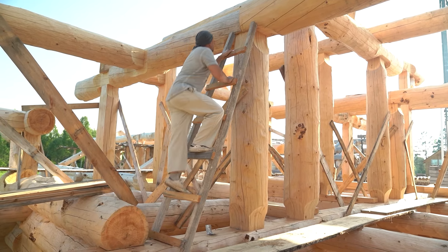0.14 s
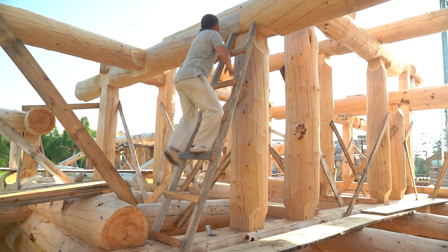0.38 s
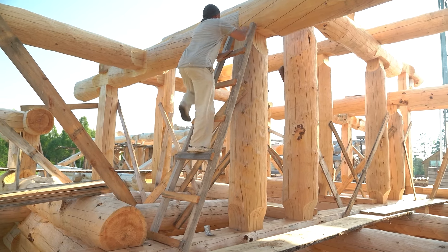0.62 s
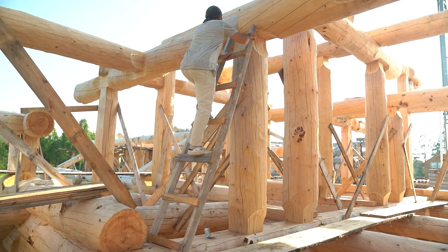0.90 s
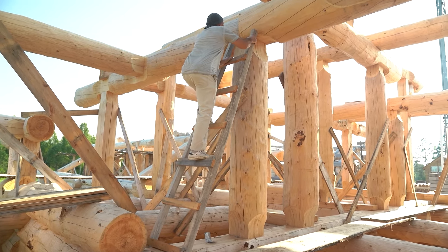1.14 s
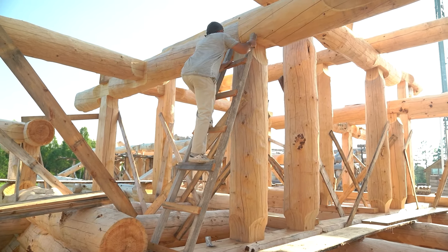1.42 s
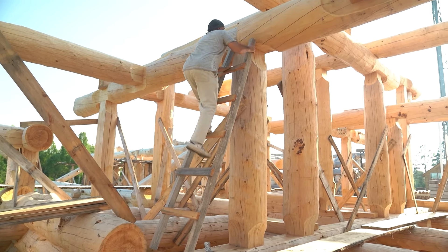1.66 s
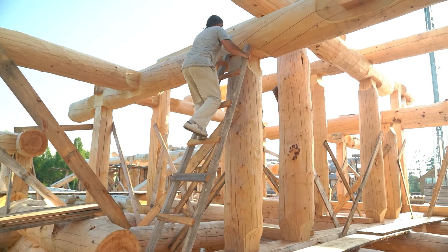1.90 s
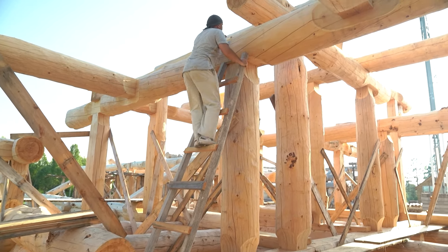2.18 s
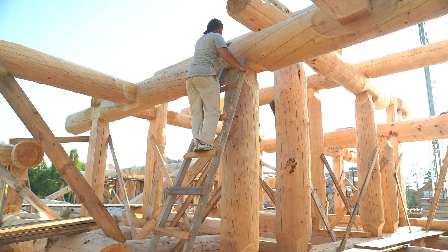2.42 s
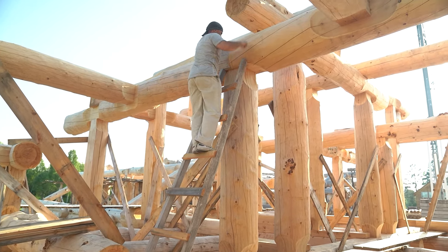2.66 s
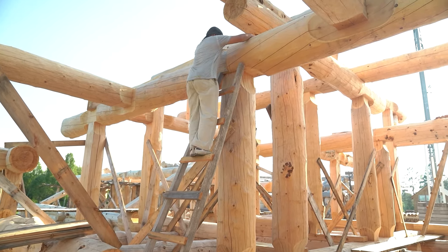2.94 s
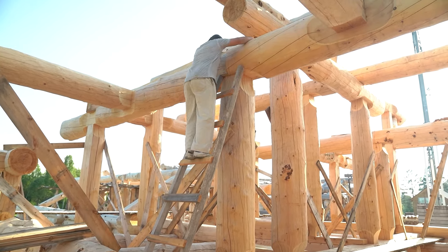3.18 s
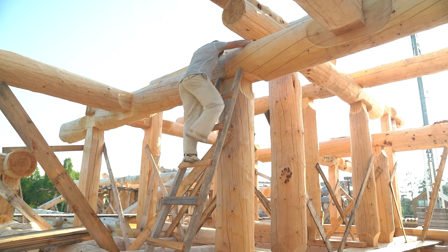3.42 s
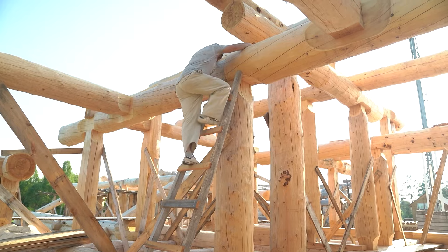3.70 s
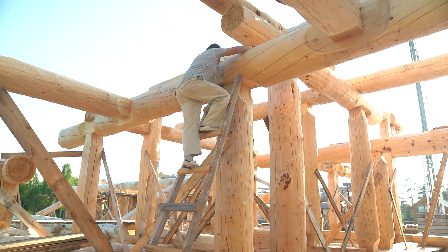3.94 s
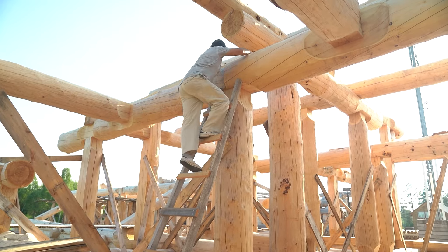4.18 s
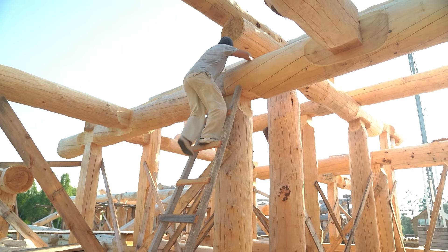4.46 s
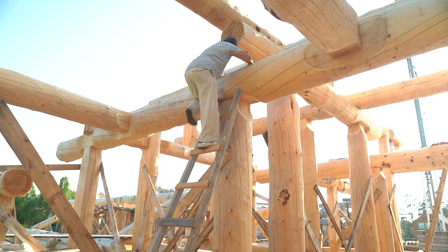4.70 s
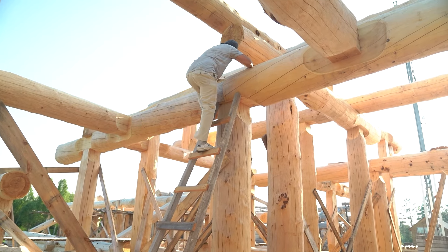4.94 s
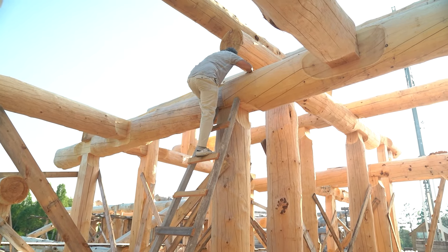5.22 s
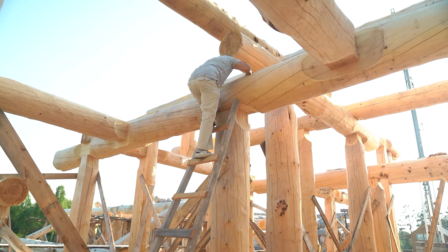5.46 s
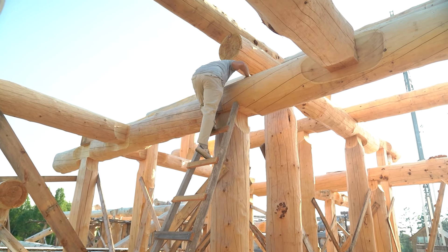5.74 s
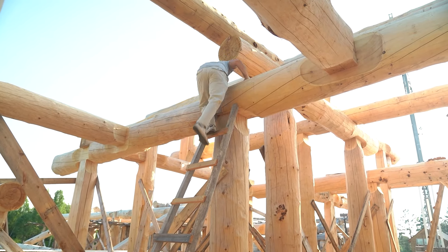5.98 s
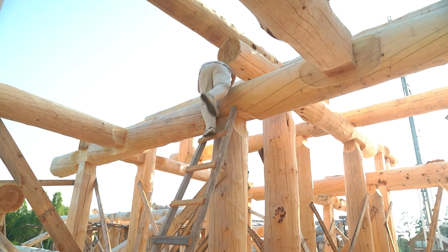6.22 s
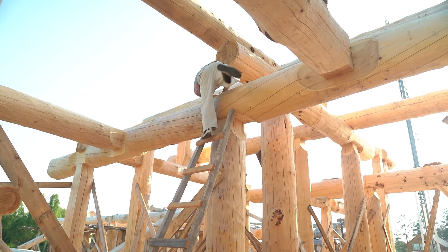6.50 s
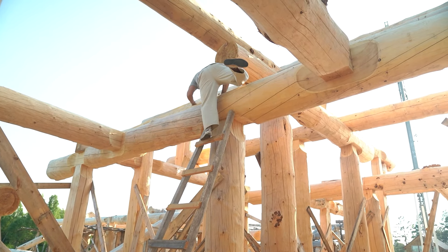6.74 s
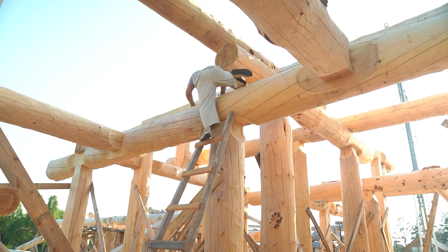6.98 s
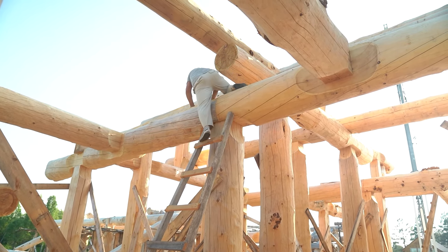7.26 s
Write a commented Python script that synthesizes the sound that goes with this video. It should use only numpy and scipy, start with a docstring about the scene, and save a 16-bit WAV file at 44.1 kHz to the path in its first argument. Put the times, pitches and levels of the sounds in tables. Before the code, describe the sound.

Outdoors among large logs, someone climbs a wooden ladder, heard fairly close in mono. Strong clacks at about 0.24, 0.53 and 0.65 s run into a tight rattle of smaller knocks until 1.3 s, with a low wind thump at 1.1. A sharp, bright crack lands at 1.6, a lighter knock at 2.0, then more at 2.35 and a hard one at 2.7. Hollow double knocks follow near 3.03 and 3.36. After that blows are sparse: light at 4.25, duller, ringing thunks at 5.04 and 5.8, and a crisp tick at 6.04. Fabric swishes and sole or hand scrapes come throughout, notably at 2.5-3.2, 3.6 and 6.85 s, and persist to the end. Wind buffets irregularly, heaviest around 2.9 and 5.9 s. A very faint, thin bird chirp rises at 5.65. Short dull echoes and soft steady hiss surround everything.

```python
"""Feet and rails knock on wood and ring as someone climbs a wooden ladder on a frame of big logs outdoors.
Each knock excites decaying modes, dense cracking noise and a short snap; the logs scatter dull echoes.
Short bright ticks are noise puffs, and cloth, soles and hands rub as swelling strokes of grainy noise.
Wind thuds on the microphone as lumpy low noise, a faint bird chirps once as a gliding sine,
and shaped noise gives a faint airy hiss."""
import sys
import numpy as np
from scipy import signal
from scipy.fft import rfft, irfft, next_fast_len
from scipy.io import wavfile

SR = 44100
rng = np.random.default_rng(int(sys.argv[2]) if len(sys.argv) > 2 else 0)


def digitize_waveform(pressure):
    """Quantize a signal to 16-bit integers and store it at the path in sys.argv[1].

    Rows of a 2-D input are taken as channels; values are limited to [-1, 1].
    """
    field = np.atleast_2d(pressure).T
    bounded = np.clip(field, -1, 1)
    quanta = np.round(bounded * 32767).astype(np.int16)
    wavfile.write(sys.argv[1], SR, quanta)


def magnitude_from_level(level_db):
    """Linear magnitude for a level in decibels (20 dB per decade)."""
    exponent = np.asarray(level_db, float) / 20
    return 10 ** exponent


N = 325017   # length in samples

# blows on the wood, with relative levels: start_s, contact_level_db (around the contact pitch),
# contact_pitch_octaves (over 1 kHz), low_level_db (low ladder modes), top_level_db (hard top and snap)
BLOWS = [(0.05, -33, -0.68, -39, -42), (0.082, -36, -1.4, -38, -57), (0.115, -37, -0.37, -41, -60),
         (0.237, -10.5, -0.46, -30.5, -23.5), (0.247, -19.5, 0.22, -42, -18),
         (0.256, -29, -0.46, -37, -34.5), (0.387, -31, -0.54, -50, -43.5), (0.526, -31, -0.013, -50, -41),
         (0.534, -13.5, -0.11, -27, -24), (0.545, -28, -0.87, -37, -56), (0.563, -37, -1.1, -38, -59),
         (0.648, -10, -0.37, -22.5, -19), (0.658, -24, -0.65, -47.5, -25.5),
         (0.669, -19, -0.11, -21.5, -23.5), (0.694, -18, -0.41, -22.5, -33.5), (0.77, -30, 0.46, -25, -33),
         (0.785, -21, -0.73, -41, -43), (0.801, -29.5, -0.37, -24, -33), (0.838, -22.5, -1.66, -28.5, -37),
         (0.878, -25, -0.42, -27, -35), (0.95, -33.5, -0.75, -33.5, -44), (1.004, -24, -0.26, -24, -40),
         (1.045, -25.5, -0.4, -27, -35), (1.071, -18, -1.43, -54, -37), (1.086, -18, 0.11, -19, -25.5),
         (1.145, -43, -0.34, -28, -57), (1.212, -27, -0.53, -22, -40.5), (1.304, -31, -0.38, -43, -40.5),
         (1.453, -35.5, -0.54, -63, -59), (1.486, -21, -0.78, -27, -38), (1.549, -28.5, -0.044, -37, -35),
         (1.597, -8.5, 0.95, -24, -22), (1.604, -21.5, -0.3, -37, -23.5), (1.63, -21.5, -0.48, -23.5, -31),
         (1.698, -33, 0.23, -46, -37), (1.997, -19.5, -0.04, -25, -26), (2.194, -27, -0.46, -49, -36),
         (2.287, -32, -0.52, -36.5, -43), (2.342, -17, .3, -22, -29), (2.394, -33, -0.33, -38.5, -46),
         (2.462, -35, -0.75, -46, -48), (2.571, -28, -0.45, -40, -42), (2.583, -29.5, -1.4, -29.5, -42),
         (2.702, -13.5, 0.099, -19.5, -17), (2.712, -36, .2, -36, -22.5),
         (2.722, -27.5, -0.065, -23.5, -33), (2.791, -22.5, 0, -22.5, -28), (2.831, -36, .2, -27, -38),
         (3.017, -22, -0.46, -23, -35), (3.041, -25, -0.3, -21, -26), (3.35, -22, 0.12, -20, -25),
         (3.361, -22, -0.65, -23, -29.5), (3.384, -31.5, 0.29, -21.5, -38), (3.881, -24, -1.87, -46, -60),
         (3.988, -34, -0.55, -45, -43.5), (4.161, -45, 0.11, -45, -34), (4.195, -35.5, -0.3, -42, -40),
         (4.252, -22, -0.27, -22, -29.5), (4.478, -33.5, -0.31, -29, -46.5),
         (4.772, -42.5, -0.61, -49.5, -53), (5.023, -50, -0.11, -26.5, -43),
         (5.038, -21, -0.36, -17.5, -29), (5.073, -31, -0.58, -32, -48), (5.123, -29, -1.1, -32.5, -61),
         (5.236, -31, -0.31, -26, -42.5), (5.382, -32, -1.7, -40, -68), (5.779, -32.5, -0.25, -27.5, -45),
         (5.805, -18.5, -0.47, -15.5, -33.5), (5.832, -31, -0.058, -19.5, -39),
         (6.039, -28.5, -0.24, -42.5, -54), (6.472, -41, -0.86, -67, -59)]
# change of the wood's response during the climb, the free ladder singing more higher up:
# time_s, low_mode_gain_db, low_thud_gain_db
CLIMB_RESPONSE = [(0, 0.5, -0.5), (2.5, -1.5, 4), (4.0, 2, -12.5), (7.37, 2, -1.5)]
LOW_UNDER_HZ, TOP_OVER_HZ = 400, 2150   # limits of the low modes and of the hard top


def rms_one(x):
    """Normalization: scales a signal to unit root-mean-square."""
    return x / np.sqrt(np.mean(x ** 2) + 1e-20)


def in_time(rows):
    """Linear interpolation: turns rows of time and values into one curve per value column."""
    s, *columns = np.transpose(rows)
    return [np.interp(np.arange(N) / SR, s, column) for column in columns]


def band(x, low_hz, high_hz, order=2):
    """Band-pass filtering: a Butterworth filter passes the range between two corners."""
    corners = [low_hz, min(high_hz, .45 * SR)]
    return signal.sosfilt(signal.butter(order, corners, "band", fs=SR, output="sos"), x)


def flicker(per_s, depth_db):
    """Random amplitude modulation: a gain glides between normally distributed levels in dB."""
    knots = rng.standard_normal(int(N / SR * per_s) + 2)
    return magnitude_from_level(depth_db * np.interp(np.arange(N) / SR * per_s, np.arange(len(knots)), knots))


def struck_db(hz):
    """Contact spectrum: a blow excites low modes, a hump around its contact pitch, and a hard top."""
    contact_fall_db = 14   # loss one octave from the contact pitch, growing with the square
    _, contact_db, octave, low_db, top_db = np.transpose(BLOWS)[:, :, None]
    middle_db = contact_db - contact_fall_db * (np.log2(hz / 1000) - octave) ** 2
    upper_db = np.where(hz > TOP_OVER_HZ, top_db, middle_db)
    return np.where(hz < LOW_UNDER_HZ, low_db, upper_db)


def knocks(lift_db=-3.0, spread_db=4.0, detune=0.023, rise_s=0.0025, longest_bounce_s=.012):
    """Modal synthesis: each blow, on another rung or log, excites decaying sines of varied strength."""
    # modes of ladder and logs: pitch_hz (before detuning), level_db (relative), t60_s
    wood_modes = [(205.4, -25, 0.26), (255.3, -11, 0.24), (328.5, -1.5, 0.21), (361.2, -2, 0.13),
                  (466, -3, 0.06), (550, -9, 0.064), (695, -13, 0.077), (994, 1, 0.034), (1074, -5, 0.068),
                  (1178, 6.5, 0.023), (1535, 12.5, 0.016), (1621, 7, 0.032), (2000, -14.5, 0.028),
                  (2275, 10.5, 0.011), (2673, 8.5, 0.012), (2992, -6, 0.013), (3493, -1.5, 0.0076),
                  (4000, -3, 0.016)]
    hz, mode_db, t60 = np.transpose(wood_modes)
    starts = np.array(BLOWS)[:, 0]
    low = hz < LOW_UNDER_HZ
    size = SR // 3
    t, out = np.arange(size) / SR, np.zeros(N + 2 * size)
    decay = np.exp(-np.log(1000) * np.outer(1 / t60, t)) * (1 - np.exp(-t / rise_s))
    blow_db = struck_db(hz) + mode_db + lift_db
    blow_db += np.outer(in_time(CLIMB_RESPONSE)[0][(starts * SR).astype(int)], low)
    luck = rng.standard_normal((len(starts), 3, len(hz)))
    lags = rng.random((len(starts), 3))
    local = np.clip(hz / 1500, 0, 1)   # the long low modes belong to the whole ladder and vary less
    for s, db, (strength, shift, sign), lag in zip(starts, blow_db, luck, lags):
        pitch = hz * (1 + detune * shift * local)
        strengths = magnitude_from_level(db + spread_db * strength * local) * np.sign(sign)
        modes = decay * np.sin(2 * np.pi * np.outer(pitch, t))
        heavy = (strengths * low) @ modes
        ringing = (strengths * ~low) @ modes
        # the contact chatters, but the low modes are too slow to feel it
        out[int(s * SR):int(s * SR) + size] += heavy
        bounce_gains = magnitude_from_level(-11.25 - 7.5 * lag)   # later bounces are weaker
        for late, gain in zip([0, *lag], [1, *bounce_gains]):
            at = int((s + longest_bounce_s * late) * SR)
            out[at:at + size] += gain * ringing
    return out[:N]


def cracks(rise_s=0.0029):
    """High modal density: the same blows set off dry noise that dies band by band, in uneven spurts."""
    # groups of modes too dense to tell apart: low_hz, high_hz, level_db (relative), t60_s
    dense_modes = [(370, 750, -7.5, 0.06), (120, 396, -9, 0.18), (800, 1306, -10, 0.091),
                   (1180, 1740, -7.5, 0.07), (1900, 3870, -6, 0.043)]
    at = (np.array(BLOWS)[:, 0] * SR).astype(int)
    out, spurts = 0, flicker(per_s=250, depth_db=4.5)
    thud_db = in_time(CLIMB_RESPONSE)[1]
    centres_hz = np.array([np.sqrt(low * high) for low, high, *_ in dense_modes])
    for (low_hz, high_hz, db, t60), blow_db in zip(dense_modes, struck_db(centres_hz).T):
        power = np.full(N, 1e-18)
        power[at] = magnitude_from_level(2 * (blow_db + db))
        fall, rise = magnitude_from_level(-120 / (t60 * SR)), np.exp(-1 / (rise_s * SR))
        power = signal.lfilter([1 - rise], np.convolve([1, -fall], [1, -rise]), power)
        height = magnitude_from_level(thud_db * (low_hz < 200))   # only the lowest group follows the low thud
        noise = rms_one(band(rng.standard_normal(N) * spurts, low_hz, high_hz))
        out = out + height * np.sqrt(abs(power)) * noise
    return out


def ticks(width=1.91, lift_db=-2.0, rise_s=0.00035):
    """Impulsive noise: bright ticks, and a snap after each knock, are decaying band-passed puffs."""
    # short bright ticks, some alone and some sharpening a knock:
    # start_s, level_db (relative), centre_hz, t60_s
    bright_ticks = [(0.389, -33, 10400, 0.012), (0.4517, -34.5, 4530, 0.028), (0.537, -28, 8680, 0.018),
                    (0.6503, -18, 6000, 0.018), (0.785, -29.5, 5100, 0.018), (0.846, -29.5, 11900, 0.026),
                    (1.076, -27, 10700, 0.041), (1.5504, -22.5, 4600, 0.0076), (1.6014, -8, 4240, 0.0083),
                    (1.699, -14.5, 5370, 0.01), (2.25, -40, 4000, 0.025), (1.8962, -34, 4000, 0.058),
                    (1.948, -29.5, 7730, 0.0091), (2.3348, -30, 5250, 0.016), (2.3466, -21, 4230, 0.06),
                    (2.4842, -31, 4200, 0.024), (2.5208, -38.5, 6920, 0.11), (2.571, -25.5, 11400, 0.0064),
                    (5.7794, -27, 7000, 0.012), (6.0405, -8, 4500, 0.0067), (6.3093, -42.5, 4140, 0.032)]
    # each snap comes 2.7 ms after its knock, 4 dB under the level of the hard top
    snaps = [(s + 0.0027, top_db - 4, 4230, 0.047) for s, *_, top_db in BLOWS]
    rows = list(bright_ticks) + snaps
    size = 4096
    out, t = np.zeros(N + size), np.arange(size) / SR
    noise = rng.standard_normal((len(rows), size))
    for (s, db, hz, t60), puff in zip(rows, noise):
        envelope = magnitude_from_level(db + lift_db - 60 * t / t60) * (1 - np.exp(-t / rise_s))
        at = int(s * SR)
        out[at:at + size] += band(puff, hz / width, hz * width, order=1) * envelope
    return out[:N]


def grit(per_s=7.4, level_db=-49.5, spread_db=2.0, decay_s=0.0017):
    """Random point process: stray faint clicks of wood and grit, each a decaying puff of noise."""
    born = rng.random(N) < per_s / SR
    sizes = magnitude_from_level(level_db + spread_db * np.minimum(rng.exponential(1, N), 3))
    puffs = signal.lfilter([1], [1, -np.exp(-1 / (decay_s * SR))], born * sizes + 1e-18)
    return band(puffs * rng.standard_normal(N), 840, 7600, order=1)


def rubs(edge=0.72):
    """Friction noise: cloth, soles and hands make grainy band-passed strokes that swell and stop."""
    # cloth swishing, bright and wide: start_s, length_s, swell_share (of the length, held to
    # 0.05-0.95 below), level_db (before the swell)
    cloth_swishes = [(0, 1, 0.07, -62.5), (0.431, 0.044, .3, -42.5), (.7, 0.42, 0.44, -75),
                     (0.835, 0.012, 0.42, -43), (0.968, 0.083, 0.84, -46.5), (1.062, 0.048, 0.36, -43.5),
                     (1.863, 0.087, 0.7, -51.5), (2.348, 0.12, .2, -52.5), (2.45, 0.068, 0.52, -51),
                     (2.53, 0.33, 0.8, -43.5), (2.883, 0.04, 0.21, -53), (3.023, 0.18, 0.065, -40.5),
                     (3.553, 0.31, 0.58, -47), (4.007, 0.058, 0.55, -53.5), (4.105, 0.069, 0.3, -51),
                     (4.626, 0.03, 0.24, -51.5), (4.876, 0.3, 0.47, -55), (5.404, 0.24, 0.25, -51.5),
                     (5.764, 0.097, 0.44, -47.5), (6.058, 0.11, 0.74, -46), (6.265, 0.032, .45, -57),
                     (6.383, 0.084, 1, -56.5), (6.624, 0.076, 0.28, -48), (6.854, 0.047, 0.7, -37),
                     (6.923, 0.085, 0.37, -59.5), (7.139, 0.17, 0.89, -52.5)]
    # soles and hands scraping wood: start_s, length_s, level_db (before the swell), low_hz, high_hz
    wood_scrapes = [(0, 0.024, -43.5, 395, 2840), (0.965, 0.1, -43, 900, 3100),
                    (1.373, 0.123, -58.5, 500, 2400), (2.427, 0.35, -48, 600, 1140),
                    (2.515, 0.027, -37, 5930, 7100), (.76, 0.38, -58.5, 300, 2940),
                    (3.05, 0.17, -47, 304, 2040), (3.834, 0.65, -57, 300, 2550),
                    (5.4, 0.19, -49, 249, 2100), (6.033, 0.084, -53, 500, 1900),
                    (6.546, 0.12, -63, 5300, 6000), (6.564, 0.2, -53.5, 1770, 2210),
                    (6.912, 0.19, -50.5, 800, 3000), (7.195, 0.12, -49, 1370, 1980),
                    (7.242, 0.056, -44, 3740, 5900)]
    strokes = [(*row, 2130, 13500) for row in cloth_swishes]
    strokes += [(s, length, 0.52, *rest) for s, length, *rest in wood_scrapes]   # 0.52: swell share
    out, noise = np.zeros(N), rng.standard_normal(N) * flicker(per_s=240, depth_db=2.5)
    for s, length, swell, db, low_hz, high_hz in strokes:
        part = slice(int(s * SR), min(int((s + length) * SR), N))
        stroke = rms_one(band(noise[part], low_hz, high_hz, order=1))
        peak_at = np.clip(swell, .05, .95)
        shape = np.interp(np.linspace(0, 1, len(stroke)), [0, peak_at, 1], [0, 1, 0])
        out[part] += magnitude_from_level(db) * shape ** edge * stroke
    return out


def log_frame(x, t60_s=0.18, level_db=-15.5):
    """Diffuse scattering: convolution with a short dull noise tail gives echoes off the beams."""
    t = np.arange(SR // 2) / SR
    tail = band(rng.standard_normal(len(t)), 470, 3850, order=1)
    tail = tail * magnitude_from_level(-60 * t / t60_s) * (t > .004)   # silent for the first 4 ms
    return magnitude_from_level(level_db) * signal.fftconvolve(x, tail / np.sqrt(np.sum(tail ** 2)))[:N]


def wind(evenness=0.63):
    """Turbulent pressure at the microphone: lumpy low noise, partly evened to follow the gusts."""
    # base wind, slowly varying: time_s, thud_level_db
    base_wind = [(0, -42), (.6, -41), (1.2, -34.5), (1.6, -43), (2.4, -47.5), (3.1, -37), (3.65, -48),
                 (4.1, -35), (4.9, -49), (5.6, -44.5), (6, -49), (6.45, -35), (6.8, -55.5), (7.37, -45)]
    # gusts that slap the microphone: peak_s, thud_level_db, flutter_level_db
    gust_peaks = [(0.022, -60, -33), (0.1, -55, -34), (0.45, -29, -64), (0.88, -39, -40), (1.041, -40, -27),
                  (1.111, -20, -23), (1.22, -42, -36.5), (1.379, -28, -37.5), (1.7, -33, -57),
                  (1.8, -30, -54), (2.09, -36, -60), (2.36, -44, -44), (2.868, -21.5, -39),
                  (3.37, -51, -42), (4.21, -32, -44), (4.64, -28, -62), (5.03, -53, -40),
                  (5.13, -45, -41.5), (5.82, -29, -25), (5.92, -17, -23.5), (5.98, -28, -44),
                  (6.05, -33, -42), (6.22, -39, -65), (6.51, -31.5, -30.5), (6.569, -28.5, -72),
                  (6.731, -31.5, -66), (6.889, -35, -51), (7.001, -38, -56)]
    thud_rise_db_per_s, thud_fall_db_per_s = 421, 302
    # base level against the thud, pace of gusts against the thud, low_hz, high_hz
    thud, flutter = (0, 1, 14, 48), (-18, 1.6, 55, 140)
    out, buffets, t = 0, flicker(per_s=12, depth_db=3.5), np.arange(N) / SR
    base_db, = in_time(base_wind)
    s, *peaks = np.transpose(gust_peaks)
    for (offset_db, pace, low_hz, high_hz), peak_db in zip((thud, flutter), peaks):
        gain = magnitude_from_level(base_db + offset_db)
        for at, db in zip(s, peak_db):
            drop_db = np.maximum(thud_rise_db_per_s * (at - t), thud_fall_db_per_s * (t - at))
            gain = gain + magnitude_from_level(db - pace * drop_db)
        # one extra second lets the filters settle
        lumps = band(rng.standard_normal(N + SR), low_hz, high_hz)
        envelope = abs(signal.hilbert(lumps, next_fast_len(N + SR))[:N + SR])
        evened = band(lumps / envelope ** evenness, low_hz, high_hz)[SR:]
        out = out + gain * rms_one(buffets * evened)
    return out


def bird():
    """Frequency modulation: one thin sine whistle rises, then dips slightly."""
    # the whistle: time_s, pitch_hz, level_db (rms)
    whistle = [(5.635, 7500, -65), (5.663, 8300, -56), (5.69, 8141, -61)]
    hz, db = in_time(whistle)
    on, off = whistle[0][0], whistle[-1][0]
    gate = np.interp(np.arange(N) / SR, [on - .006, on, off, off + .006], [0, 1, 1, 0])
    return np.sqrt(2) * gate * magnitude_from_level(db) * np.sin(2 * np.pi * np.cumsum(hz) / SR)


def air(level_db=-55):
    """Spectral shaping: white noise filtered to a broad spectrum makes a gently wandering hiss."""
    # shape of the hiss: pitch_hz, density_db (per Hz, relative)
    hiss_spectrum = [(59, -19), (100, 3.5), (381, -3.5), (662, -8), (1010, -9), (1420, -14), (10700, -23),
                     (14100, -25.5), (16000, -31)]
    size = next_fast_len(N)
    hz, db = np.transpose(hiss_spectrum)
    bins = np.fft.rfftfreq(size, 1 / SR) + 1   # 1 Hz added to keep the logarithm finite
    gain_db = np.interp(np.log(bins), np.log(hz), db, left=-90, right=-90)
    hiss = irfft(rfft(rng.standard_normal(size)) * magnitude_from_level(gain_db), size)[:N]
    return magnitude_from_level(level_db) * rms_one(hiss) * flicker(per_s=2.3, depth_db=1.2)


def scene():
    """Superposition: direct sounds, echoes and background add up in one channel."""
    blows = knocks() + cracks() + rubs()
    snaps = ticks() + grit()
    echoes = log_frame(blows + magnitude_from_level(-1.5) * snaps)   # small snaps are near and wake less echo
    return (blows + snaps + echoes + wind() + bird() + air())[None]


def top_cut(x):
    """Nothing passes above the cut-off."""
    return signal.sosfilt(signal.butter(12, 16520, fs=SR, output="sos"), x)


def record(dry):
    """Low-pass response: the microphone rolls off at the very top, above 14.2 kHz."""
    heard = signal.sosfilt(signal.butter(8, 14200, fs=SR, output="sos"), dry)
    return top_cut(heard)


dry = scene()
out = record(dry)
digitize_waveform(out)
```